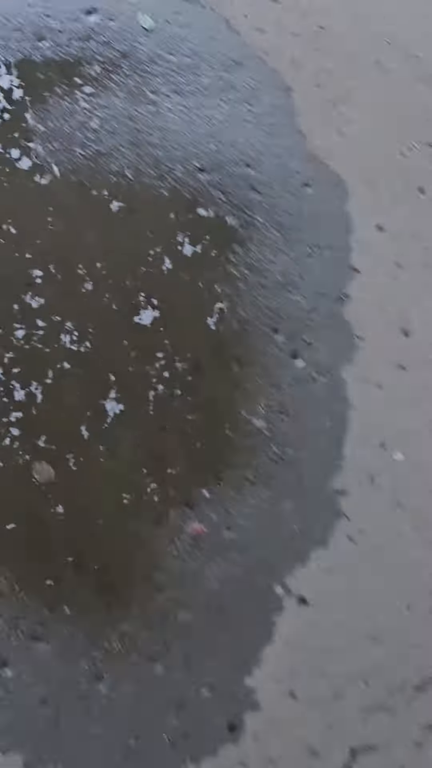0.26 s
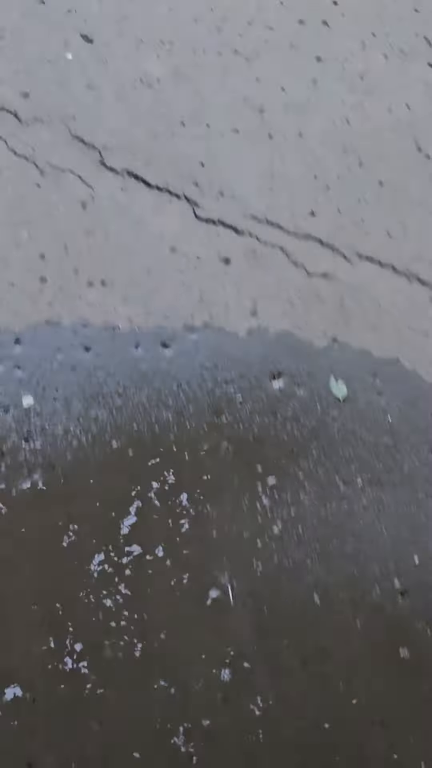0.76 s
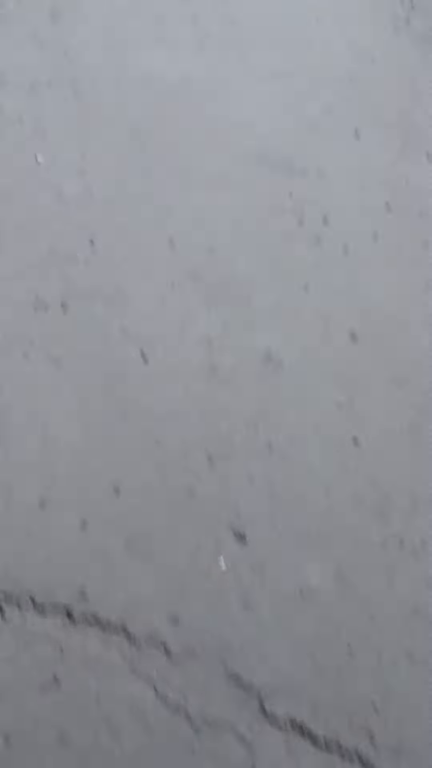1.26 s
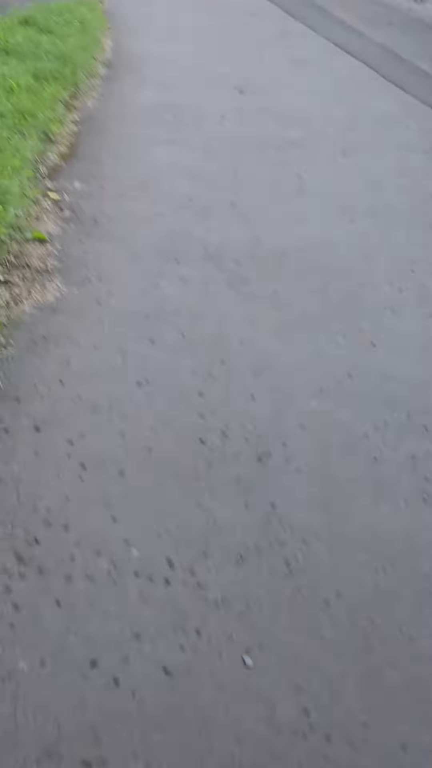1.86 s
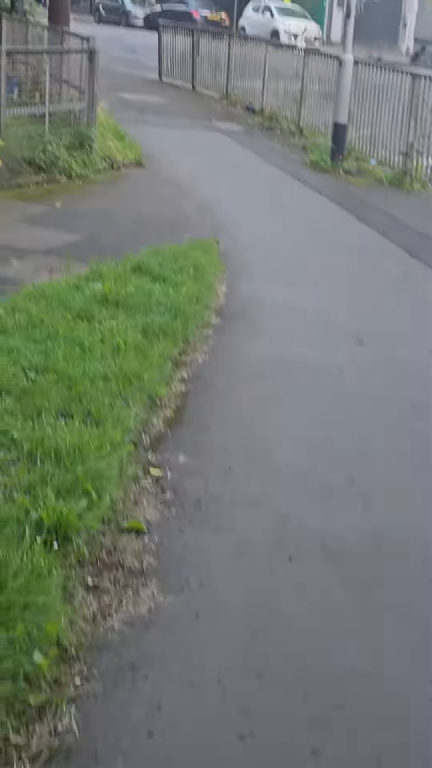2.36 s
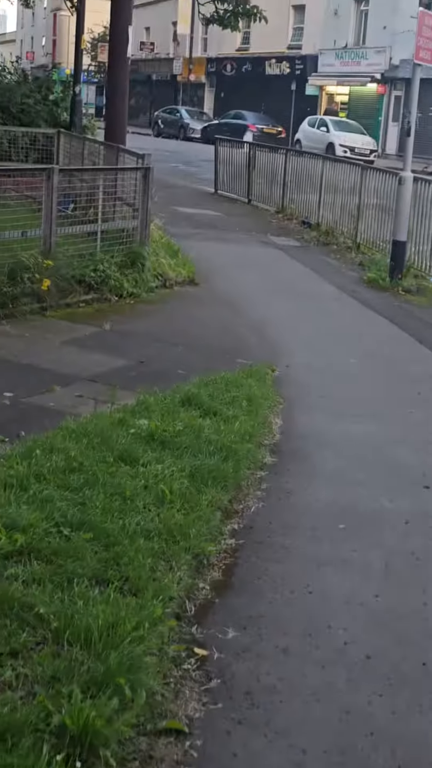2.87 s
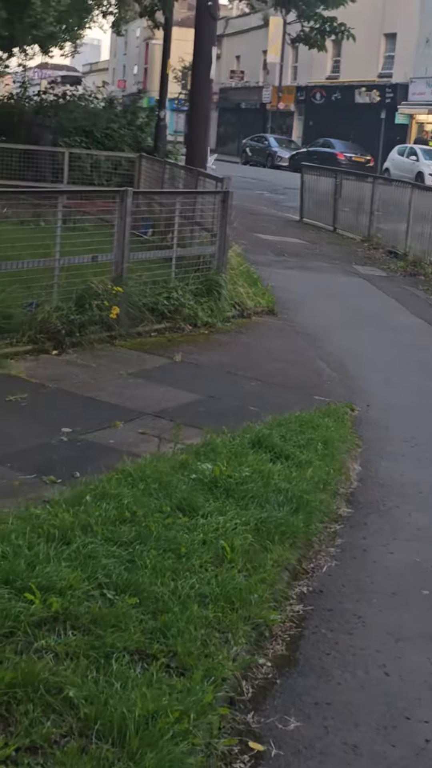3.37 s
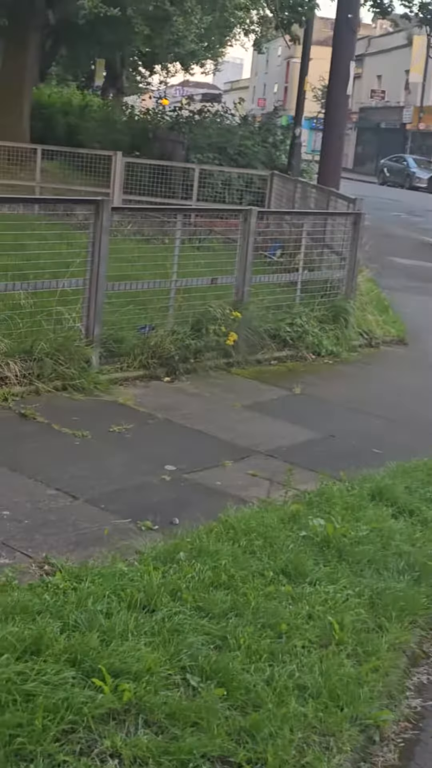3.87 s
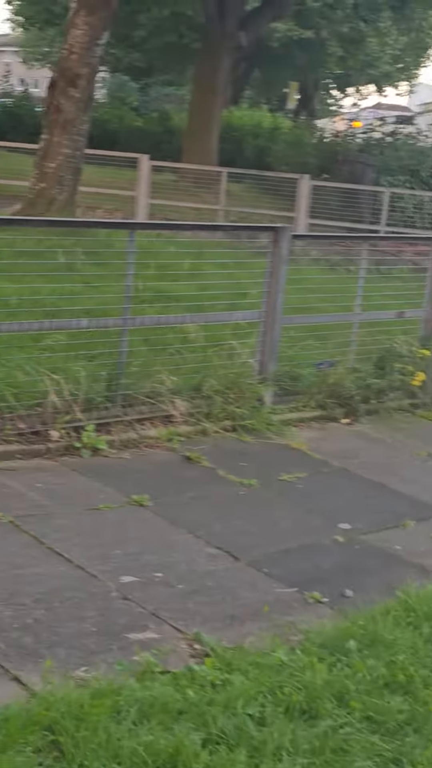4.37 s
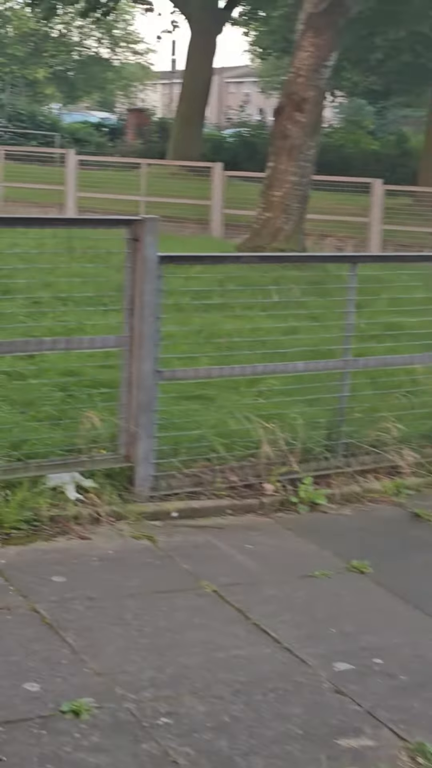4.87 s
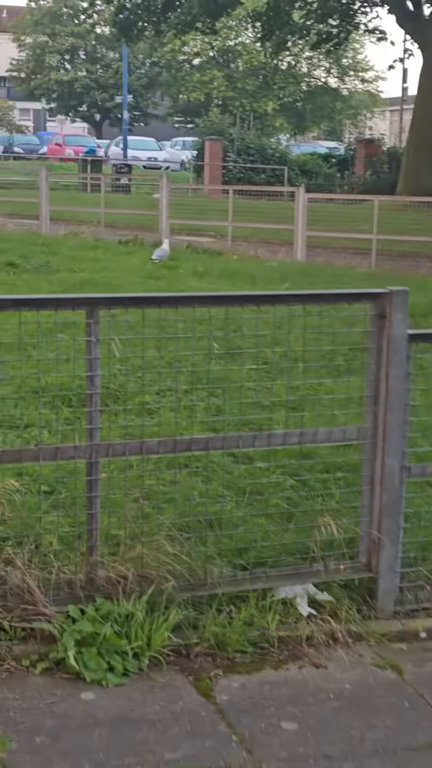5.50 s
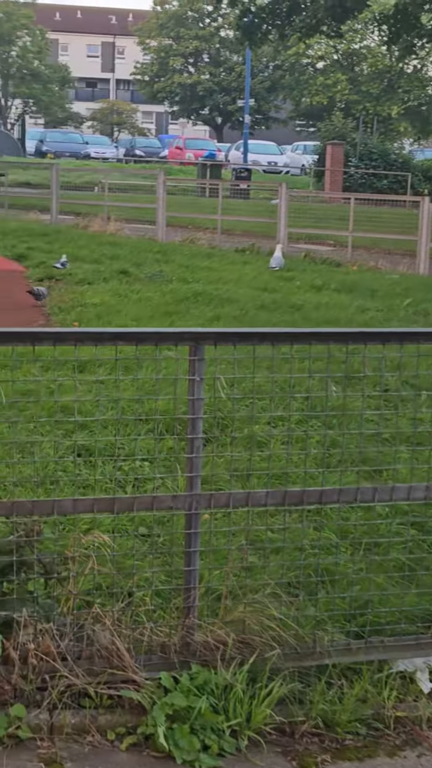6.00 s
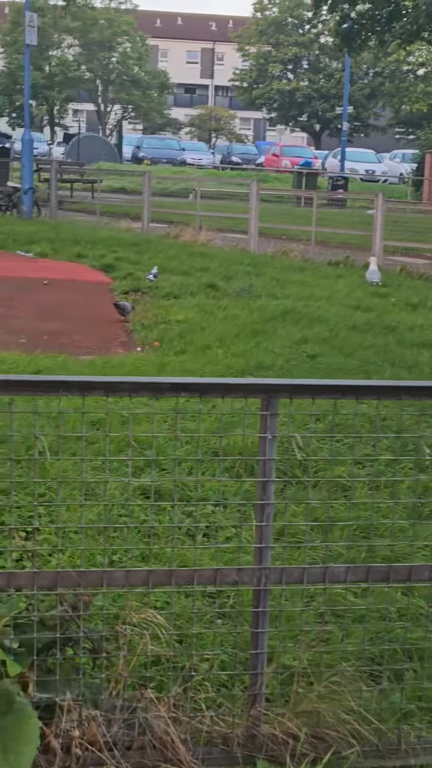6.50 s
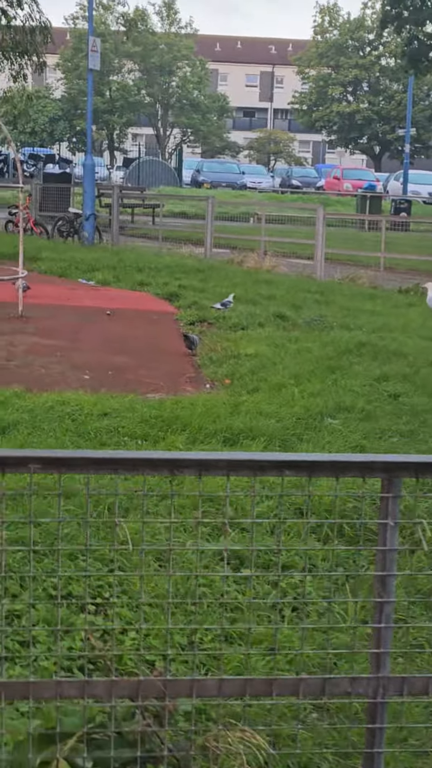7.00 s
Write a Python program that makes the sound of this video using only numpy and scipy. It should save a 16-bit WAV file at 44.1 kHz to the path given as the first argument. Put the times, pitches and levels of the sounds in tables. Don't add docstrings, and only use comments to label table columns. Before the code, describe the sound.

Outdoors by an urban green, low traffic rumbles and engines drone, gradually louder. A gull yelps twice at the start, a songbird whistles falling phrases ending in reedy notes and churrs, then the gull gives three long harsh caws. Close soles scuff and knock on a gritty path. Handheld stereo microphone; birds echo softly off buildings.

```python
import sys
import numpy as np
from scipy import signal
from scipy.fft import rfft, irfft
from scipy.io import wavfile
from scipy.ndimage import uniform_filter1d

SR = 44100
rng = np.random.default_rng(int(sys.argv[2]) if len(sys.argv) > 2 else 0)


def gain_from_db(level_db):
    decades = np.asarray(level_db, float) / 20
    return 10 ** decades


def unload_audio(sound):
    columns = np.transpose(np.atleast_2d(sound))
    steps = np.round(np.clip(columns, -1, 1) * 32767)
    wavfile.write(sys.argv[1], SR, steps.astype(np.int16))


N = 319725
TIME = np.arange(N) / SR


def rms_one(x):
    return x / np.sqrt(np.mean(x ** 2) + 1e-20)


def in_time(rows):
    s, *columns = np.transpose(rows)
    return [np.interp(TIME, s, c) for c in columns]


def progress(start, length):
    return np.clip((TIME - start) / length, 0, 1)


def gate(start, end, edge_s):
    return np.clip(np.minimum(TIME - start, end - TIME) / edge_s + .5, 0, 1)


def peaks_db(rows):
    slopes = []
    for s, db, rise, fall in rows:
        slopes.append(db - 20 * np.maximum((s - TIME) / rise, (TIME - s) / fall))
    return np.max(slopes, axis=0)


def at_hz(points, hz):
    point_hz, point_db = np.transpose(points)
    return np.interp(np.log(hz), np.log(point_hz), point_db)


def drift(rate):
    r = np.exp(-40 * np.pi * rate / SR)
    slow = signal.lfilter([1], [1, -2 * r, r * r], rng.standard_normal(N // 20 + 2002))[2000:]
    return np.interp(np.arange(N) / 20, np.arange(len(slow)), rms_one(slow - slow.mean()))


def phase_of(hz):
    return 2 * np.pi * np.cumsum(hz) / SR


def noise(spectrum, alike):
    hz = np.maximum(np.fft.rfftfreq(N, 1 / SR), 1)
    mid, side = rfft(rng.standard_normal((2, N))) * gain_from_db(at_hz(spectrum, hz))
    c = np.clip(at_hz(alike, hz), 0, 1)
    return rms_one(irfft(np.sqrt(1 + c) * mid + np.sqrt(1 - c) * side * [[1], [-1]], N))


def placed(x, pan_db, lag_s):
    left = np.interp(TIME - lag_s, TIME, x) * gain_from_db(pan_db / 2)
    return np.array([left, x * gain_from_db(-pan_db / 2)])


def partials(phase, pairs, flutter_db, rate):
    out = 0
    for k, db in pairs:
        flutter = flutter_db * np.minimum(drift(rate), np.sqrt(3))
        out = out + np.sqrt(2) * gain_from_db(db + flutter) * np.sin(k * phase + k * k)
    return out


def traffic():
    # start_s, rumble_db
    approach = [(0, -48), (2.3, -47.5), (2.7, -44), (4.06, -45), (4.8, -43), (5.5, -43.5), (6.3, -41),
                (7.25, -40.5)]
    # frequency_hz, density_db
    rumble_colour = [(12, -52), (20, -39.5), (24, -27), (35, -10), (59, -7), (118, -10.5), (145, -16),
                     (220, -20), (241, -17), (329, -49), (450, -31.5), (580, -66), (990, -120)]
    roar_colour = [(150, -14), (250, 0), (546, -8), (813, -8.5), (1150, -9), (1250, -8.5), (1490, -13),
                   (2150, -18), (3140, -30.5), (3430, -29), (3740, -33), (4220, -37), (15800, -111)]
    # frequency_hz, likeness (0-1)
    likeness = [(60, 0.91), (150, 0.99), (380, 0.91), (950, 0.42), (2380, 0.017), (5980, 0.098),
                (15000, 0.15)]
    # start_s, firing_hz
    firing = [(0, 58), (2.6, 57.54), (3.2, 55.61), (5.9, 55.81), (6.6, 57.9), (7.25, 58.05)]
    # start_s, drone_db
    load = [(0.0, -44), (0.64, -51.5), (0.79, -43.5), (1.84, -47.5), (1.94, -47), (2.32, -43.5),
            (2.62, -31.5), (2.73, -51.5), (3.67, -37), (3.76, -45.5), (5.27, -32), (5.47, -51), (5.61, -31),
            (6.38, -38.5), (6.54, -47.5), (6.66, -32), (7.25, -37)]
    # peak_s, peak_db, rise_s, fall_s (each over 20 dB)
    surges = [
        (1.94, -24, 0.029, 0.25),
        (3.67, -33.5, 0.43, 0.11),
        (6.38, -30.5, 0.48, 0.17),
        (6.9, -35, 0.56, 0.57),
    ]
    # start_s, low_hz, low_db, high_hz, high_db
    hums = [(0, 180.5, -59.5, 225, -71), (2.5, 171.6, -52.5, 227.8, -58), (4.3, 163.6, -55.5, 218.3, -51.5),
            (7.25, 171.6, -60, 219.9, -60)]

    (rumble_db,), (firing_hz,), (drone_db,) = in_time(approach), in_time(firing), in_time(load)
    rumble = gain_from_db(rumble_db + 2.5) * noise(rumble_colour, likeness) * gain_from_db(drift(1.4))
    roar_db = rumble_db - 9
    roar = gain_from_db(roar_db + 4.5) * noise(roar_colour, likeness) * gain_from_db(drift(3.0))

    phase = phase_of(firing_hz * (1 + 0.013 * drift(2.23)))
    drone = partials(phase, [(1, drone_db), (2, drone_db - 17.5)], flutter_db=3.5, rate=6.3)
    second_db = np.maximum(drone_db - 8.5, peaks_db(surges))
    phase = phase_of(70 * (1 + 0.028 * drift(2.9)))
    drone += partials(phase, [(0.95, second_db - 10)], flutter_db=6.5, rate=5.1)
    low_hz, low_db, high_hz, high_db = in_time(hums)
    for hum_hz, hum_db in (low_hz, low_db), (high_hz, high_db):
        phase = phase_of(hum_hz * (1 + 0.01262 * drift(4.4)))
        drone += partials(phase, [(0.99, hum_db)], flutter_db=5.0, rate=5.4)
    return rumble + roar + drone * gain_from_db([[.3], [-.3]])


def whistles():
    # start_s, length_s, first_hz, last_hz, level_db
    notes_sung = [(0.0, 0.094, 3530, 3270, -54), (1.179, 0.03, 3160, 3030, -49.5),
                  (1.269, 0.17, 4116, 4127, -45.5), (1.449, 0.18, 3482, 3403, -46.5),
                  (1.687, 0.16, 5690, 5560, -75.5), (1.866, 0.11, 5160, 4700, -76.5),
                  (2.225, 0.016, 3620, 3885, -54), (2.26, 0.055, 3960, 4600, -79.5),
                  (2.323, 0.11, 4083, 4200, -41.5), (2.326, .118, 3640, 3640, -53),
                  (2.443, 0.1, 3465, 3376, -47.5), (2.553, 0.29, 3416, 3315, -47.5),
                  (2.84, 0.083, 3313, 3217, -36.5), (2.939, 0.04, 2930, 3050, -55),
                  (2.988, .035, 2750, 2637, -56), (3.031, 0.11, 2583, 2540, -48),
                  (3.131, 0.023, 2450, 2080, -49.5), (4.181, 0.11, 3686, 3563, -43),
                  (4.47, 0.16, 2607, 2497, -44.5), (6.149, 0.14, 3900, 3820, -55.5),
                  (6.33, 0.095, 3260, 3220, -54.5), (1.213, 0.088, 4220, 4260, -65),
                  (3.718, 0.33, 3070, 3070, -71), (6.573, 0.077, 2120, 2150, -56.5),
                  (3.143, .04, 2650, 2780, -51), (4.467, .12, 3320, 3380, -51),
                  (1.417, 0.049, 3630, 3540, -59), (1.612, .08, 5570, 5740, -80),
                  (1.575, 0.017, 4300, 4450, -71), (2.928, .08, 3213, 3170, -43.5),
                  (2.995, .02, 4080, 4000, -65), (4.128, 0.063, 4420, 4180, -76.5),
                  (4.29, 0.19, 3546, 3340, -45), (4.328, .06, 5280, 5180, -64),
                  (6.111, .04, 4020, 4000, -62), (6.257, 0.06, 3286, 3270, -63)]
    # pan_db, throb_depth (0-1), wobble_percent, level_change_db, octave_db (re the note)
    manner = [(4, 0.4, .25, 2, -33), (-3, 1, 0.45, -5.5, -20), (-2.5, 0, 0.35, -10, -43),
              (-5, 0.44, .1, -14.5, -34), (0.5, 0.3, 0.12, 2.5, -30.5), (-1.5, .2, 0.12, -6, -29),
              (-8.5, 0.8, .36, -11, -39), (6, .45, 0.48, 22, -30), (5, 0.34, 0.11, -17, -32),
              (8, 0.4, 0.22, -14, -24), (2.45, 0, 0.25, 1, -21), (2, 0.63, 0.36, 4.5, -25),
              (-1.46, 0.9, 0.32, -19, -32.5), (9, 0.8, 0.73, -2, -35), (6.5, 0.8, 2.2, 17, -18),
              (6, 0.57, 3.2, 5.5, -15.5), (6.5, 0.2, 2.29, 10.5, -8.5), (3.5, 0.25, 0.46, 5, -24.5),
              (9.5, 0.98, 0.23, -6.5, -13.5), (6.5, 0.2, 1.1, -3, -21), (1.6, 0.7, 0.7, 5, -28),
              (2, 0.2, 0.24, -2, -35), (0.1, 0.8, 0.42, -2, -35), (-1, .5, 0.74, .1, -28),
              (3, .3, 0.55, 2, -30), (2, .5, 1.26, -2, -25), (-12, 0, 0.09, 3, -40),
              (-2.5, .3, 0.18, 2, -40), (2, .1, .1, -3, -40), (-1, 1, 0.49, -8, -25.5), (7, .1, .3, 2, -40),
              (4.5, 0.3, .1, 10, -40), (3, 0.47, 0.97, -2, -18.5), (5.5, .3, 0.59, -9, -42),
              (8, .2, 0.32, -4, -40), (-0.3, .2, 0.36, -4, 2.5)]
    scoop_share, scoop_s = .02, 0.006
    lag_ms, lag_ms_per_db = 0.027, 0.5

    out, throb, shake = 0, phase_of(30 * (1 + 0.3 * drift(12))), drift(94.0)
    for row, (pan_db, depth, wobble, change_db, octave_db) in zip(notes_sung, manner):
        s, length, first_hz, last_hz, db = row
        share = progress(s, length)
        scoop = 1 + scoop_share * np.exp(-share * length / scoop_s)
        hz = (first_hz + (last_hz - first_hz) * share) * scoop
        phase = phase_of(hz * (1 + wobble / 100 * (np.cos(throb) + 0.748 * shake)))
        wave = np.sin(phase) + gain_from_db(octave_db) * np.sin(2 * phase)
        wave += gain_from_db(octave_db - 18.0) * np.sin(3 * phase)
        note = np.sqrt(2) * gain_from_db(db + change_db * share) * wave
        note *= gate(s, s + length, 0.0062) * (1 + depth * np.sin(throb))
        out = out + placed(note, pan_db, (lag_ms + lag_ms_per_db * pan_db) / 1000)
    return out


def house_fronts(x):
    t60_s, echo_db = 0.83, -1.5
    t = np.arange(int(1.4 * SR)) / SR
    onset = np.clip(t / 0.018, 0, 1)
    tail = rng.standard_normal((2, len(t))) * gain_from_db(-60 * t / t60_s) * onset
    tail = tail / np.sqrt(np.sum(tail ** 2) / 2)
    tail = signal.lfilter([.6], [1, -.4], tail)
    return gain_from_db(echo_db) * signal.fftconvolve(x, tail, axes=1)[:, :N]


def walker():
    # peak_s, peak_db, rise_s, fall_s (each over 20 dB)
    scuffs = [(.02, -70.5, 0.13, 0.63), (.455, -50, 0.0077, 0.093), (.495, -53.5, 0.053, 0.029),
              (.55, -65, .1, 0.14), (.75, -75.5, .3, 0.32), (1.29, -69, 0.37, 0.41),
              (1.94, -69.5, 0.22, 0.049), (2.38, -72, .2, .3), (2.54, -68.5, 0.46, 0.36),
              (3.17, -64.5, 0.11, 0.39), (3.9, -64, 0.029, 0.21), (4.18, -72.5, 0.15, 1.3),
              (4.4, -71, .06, 0.024), (4.48, -59, 0.029, 0.047), (4.68, -71.5, .6, .6),
              (4.93, -65.5, 0.26, .16), (5.15, -57.5, .14, 0.16), (5.55, -72, 0.5, 0.41),
              (5.96, -68, 0.39, 0.62), (6.1, -67.5, 0.14, 0.35), (6.76, -60, 0.23, 0.12),
              (6.9, -69, 0.52, 1.5), (7.25, -62, .03, .1)]
    # frequency_hz, density_db
    scuff_colour = [(1760, -16), (3000, -10), (3640, -13.5), (4840, -15.5), (6130, -25.5), (6810, -29),
                    (7350, -22), (9180, -24.5), (10700, -23.5), (11500, -17.5), (12400, -24), (15800, -29)]
    # start_s, peak_db, pan_db
    grit = [(0.1655, -77, 0.0), (0.456, -50, -5), (1.2111, -59, 6), (1.273, -54, -13), (3.0056, -82, -2),
            (3.042, -81, 0), (3.8894, -63, -19), (3.9294, -50.5, -14), (3.9574, -53.5, -22),
            (4.185, -52, 11), (4.2954, -57, 5), (4.399, -45, -15), (4.468, -50.5, -3), (5.5767, -57, -7),
            (5.8245, -47, -16), (6.5256, -60.5, -22), (.26, -55, -2), (1.327, -60, -7), (1.45, -63, -3),
            (1.485, -62, -3), (1.62, -67, -3), (2.4423, -62, 1), (3.0829, -66, 5.5)]
    # start_s, peak_db, pitch_hz, t60_s
    knocks = [
        (1.272, -33.5, 460, 0.021),
        (1.288, -47, 3680, .02),
        (2.0, -49, 3660, 0.0093),
        (2.499, -35, 363, 0.03),
        (3.885, -39.5, 427, 0.041),
        (4.62, -38.5, 564, 0.055),
        (5.156, -26.5, 2070, 0.017),
        (6.131, -35.5, 488.4, 0.081),
    ]
    floor_db = -83.5

    grains = uniform_filter1d(rng.exponential(1, N // 40 + 1), size=2)
    grains = gain_from_db(2.8 * np.minimum(grains, 5)).repeat(40)[:N]
    hiss = rms_one(noise(scuff_colour, [(3000, 0.2), (15000, 0.02)]) * grains)
    out = gain_from_db(np.maximum(peaks_db(scuffs), floor_db) + 5.5) * hiss

    t = np.arange(int(.1 * SR)) / SR
    for s, db, pan_db in grit:
        burst = signal.lfilter([1, 0, -1], [1, -.3], rng.standard_normal(len(t)))
        crack = burst * gain_from_db(db - 7.5 - 60 * t / 0.009)
        start = round(s * SR)
        out[:, start:start + len(t)] += crack * gain_from_db([[pan_db / 2], [-pan_db / 2]])
    for s, db, hz, t60 in knocks:
        start = round(s * SR)
        out[:, start:start + len(t)] += gain_from_db(db - 60 * t / t60) * np.sin(2 * np.pi * hz * t)
    return out


def yelps():
    # start_s, length_s, top_pitch_hz, level_db
    cries = [
        (0.055, .18, 1496, -44.5),
        (0.438, .19, 1474, -47.5),
    ]
    # length_share, pitch_share (of the top), level_db, opening_db (of the overtones)
    course = [(0, .87, -1, -8), (0.118, .87, -6, -10), (.22, .96, 0, -4.5), (.36, 1.001, 0, -2),
              (0.481, .93, 6, -8.5), (.6, .875, -0.5, 0), (.8, .84, -0.5, -0.5), (1, .8, 2, -24)]
    # frequency_hz, gain_db
    throat = [(1200, -5), (1320, -2.5), (1480, -14.5), (2400, -5), (2850, -1), (3750, -1), (4450, -11)]
    # order, level_db (re the third)
    top = [(4, -9), (5, -22), (6, -27)]

    out, (course_share, *curves) = 0, np.transpose(course)
    for s, length, top_hz, db in cries:
        share = progress(s, length)
        pitch, level, opening = [np.interp(share, course_share, c) for c in curves]
        hz = top_hz * pitch
        first = db + level + at_hz(throat, hz)
        second = db + level + at_hz(throat, 2 * hz) + opening - 1
        third = db + level + at_hz(throat, 3 * hz) + opening
        pairs = [(1, first), (2, second), (3, third)] + [(k, third + under) for k, under in top]
        phase = phase_of(hz * (1 + 0.0051 * drift(39)))
        out = out + gate(s, s + length, 0.013) * partials(phase, pairs, flutter_db=3.5, rate=150)
    return placed(out, -1.7, -0.000062)


def reeds():
    # start_s, length_s, first_hz, last_hz, level_change_db
    endings = [(2.425, .14, 601, 603, -6), (3.137, .088, 700, 690, -3), (4.6, .14, 1440, 1375, -1),
               (6.65, .22, 528, 524, -3), (4.85, .09, 1415, 1410, -3), (3.275, .04, 695, 690, -2),
               (3.31, .065, 660, 640, -2), (6.885, .15, 512, 503, -3), (7.19, .07, 480, 465, 4),
               (3.21, .035, 1010, 990, 0), (4.64, .2, 955, 945, -3)]
    orders_sung = [(2, 2.72, 3), (2, 3, 4), (1, 2, 3), (3, 4, 5), (1, 2, 3), (2, 3, 6), (2, 3, 5),
                   (3, 4, 5), (3, 4, 5), (2, 3, 3.5), (2, 3, 4)]
    # first_db, second_db, third_db
    voices = [(-56.5, -52.5, -53), (-47.5, -45.5, -56), (-54, -53, -55), (-47.5, -60, -70), (-51, -46, -59),
              (-50, -56, -56.5), (-68, -53.5, -57), (-44, -54, -59), (-47, -57, -72), (-64, -49, -53.5),
              (-62, -52, -70)]
    half_depths = [.05, 0.21, 0.19, 0.22, 0.44, .2, 0.15, 0.47, .2, .2, .1]

    out = 0
    for row, voice, orders, halves in zip(endings, voices, orders_sung, half_depths):
        s, length, first_hz, last_hz, change_db = row
        share = progress(s, length)
        levels = [db + change_db * share for db in voice]
        hz = first_hz + (last_hz - first_hz) * share
        phase = phase_of(hz * (1 + 0.018 * drift(67.0)))
        pairs = list(zip(orders, levels)) + [(orders[2] + 1, levels[2] - 15.5)]
        note = (1 + halves * np.sin(phase / 2)) * partials(phase, pairs, flutter_db=4.5, rate=25)
        out = out + placed(gate(s, s + length, 0.0087) * note, -5.0, .00007)
    return out


def churrs():
    # start_s, held_s, level_db
    breaths = [
        (2.45, .12, -60.5),
        (3.177, 0.18, -47),
        (4.62, 0.17, -50.5),
    ]
    # frequency_hz, density_db
    churr_colour = [(880, -35), (1500, -26), (2110, -2.5), (2320, -10.5), (3090, -4.5), (4260, -23.5),
                    (5880, -35), (12000, -42), (15600, -68), (22000, -120)]
    rise_db_per_s, fall_db_per_s = 447, 498

    hiss = noise(churr_colour, [(2000, 0.21), (9000, 0.44)]) * gain_from_db(2.7 * drift(45))
    envelope = 0
    for s, held, db in breaths:
        outside_db = np.maximum(rise_db_per_s * (s - TIME), fall_db_per_s * (TIME - s - held))
        envelope = envelope + gain_from_db(db - np.maximum(0, outside_db))
    return envelope * hiss


def caws():
    # start_s, pitch_hz, effort_db, beak_opening_db
    cries = [
        [(4.728, 391.3, -48.5, 4), (4.76, 369.7, -47.5, -1), (4.85, 365.7, -48, -2), (4.93, 369.6, -48, 1),
         (5.05, 367, -50, 2.5), (5.2, 362, -52, 3), (5.3, 360, -58.5, -3)],
        [(5.72, 372.6, -57.5, 2), (5.8, 378, -51.5, -3), (5.92, 381.5, -50.5, -2), (6.05, 377.2, -52, 2),
         (6.15, 371, -49, 4.5), (6.25, 363.2, -55.5, 4.5), (6.32, 359.4, -59, 1)],
        [(6.56, 359.5, -58.5, 3), (6.7, 362, -54, 0), (6.82, 373, -51.5, -1), (6.93, 381.4, -48.5, -7),
         (7.03, 378.6, -47.5, -5.5), (7.13, 378, -47, -3), (7.26, 365, -53, 0)],
    ]
    # third_db, fourth_db, fifth_db (partials re the effort)
    throats = [
        (-5.5, -8, 1.5),
        (-3, -5.5, 0),
        (-10, -6, 2),
    ]
    # order, level_db (re the effort)
    top = [(6, -6.5), (7, -12), (8, -9.5), (11, -27.5)]
    # frequency_hz, density_db
    rasp_colour = [(600, -56), (1100, -2.5), (1900, 7.5), (2500, -9), (3000, -5), (3600, -52),
                   (6000, -19.5), (9000, -27), (12000, -89)]
    rasp_db = -3.5

    out, rasp = 0, noise(rasp_colour, [(500, 1.0), (9000, 0.17)])
    for rows, (third_db, fourth_db, fifth_db) in zip(cries, throats):
        hz, effort, opening = in_time(rows)
        third = effort + third_db - opening
        phase = phase_of(hz * (1 + .016 * drift(60)))
        pairs = [(2, third - 5), (3, third), (4, effort + fourth_db), (5, effort + fifth_db)]
        pairs += [(k, effort + db + 0.7 * opening) for k, db in top]
        throb = 1 + 0.5 * np.sin(phase_of(57 * (1 + 0.1 * drift(20.0))))
        voice = placed(throb * partials(phase, pairs, flutter_db=5.5, rate=90), -5.0, 0.00015)
        breath = gain_from_db(effort + rasp_db) * rasp * (1 + 1.5 * np.sin(phase))
        out = out + gate(rows[0][0], rows[-1][0], 0.016) * (voice + breath)
    return out


def scene():
    birds = whistles() + yelps() + reeds() + churrs() + caws()
    return traffic() + birds + house_fronts(birds) + walker()


def band_limit(x):
    return signal.sosfilt(signal.butter(12, 15790, fs=SR, output="sos"), x)


def record(dry):
    return band_limit(dry)


dry = scene()
out = record(dry)
unload_audio(out)
```